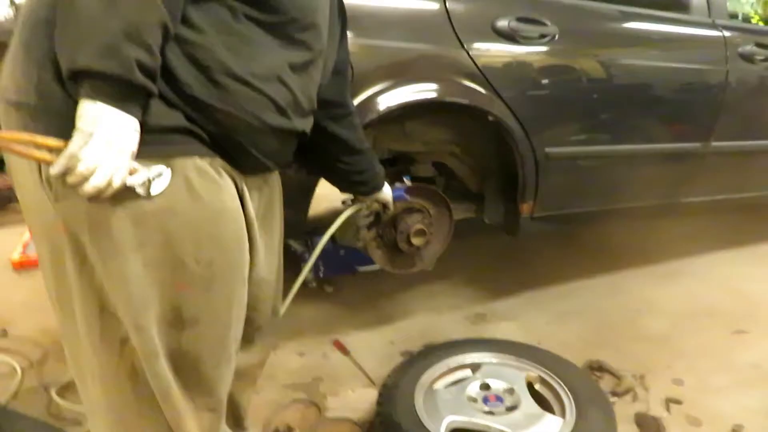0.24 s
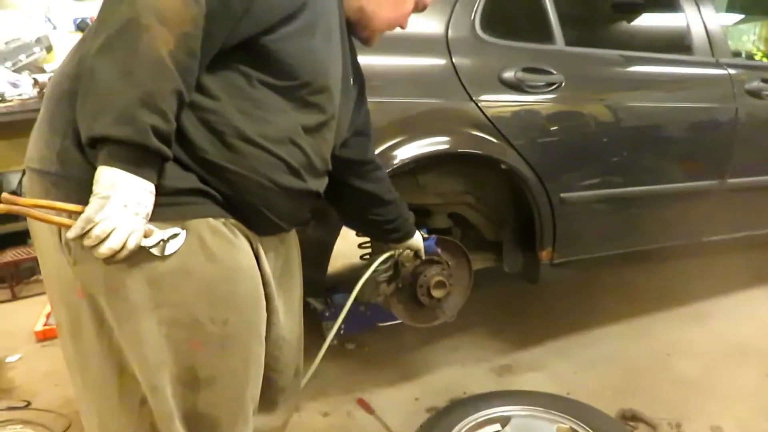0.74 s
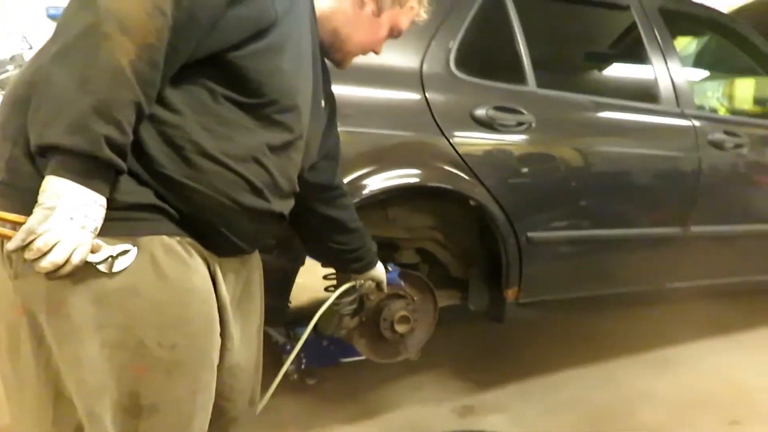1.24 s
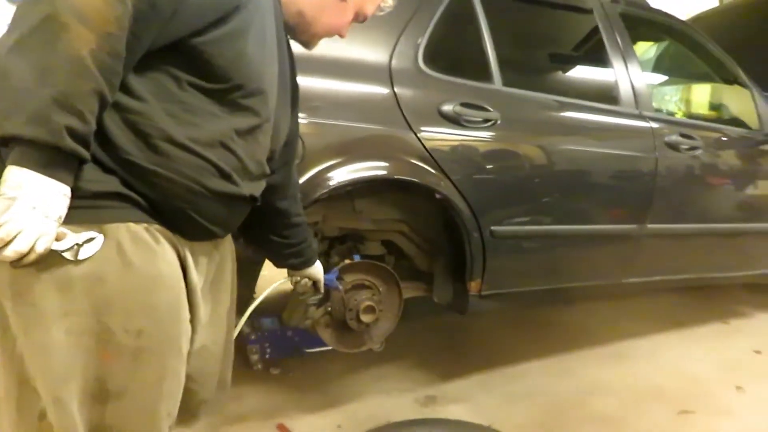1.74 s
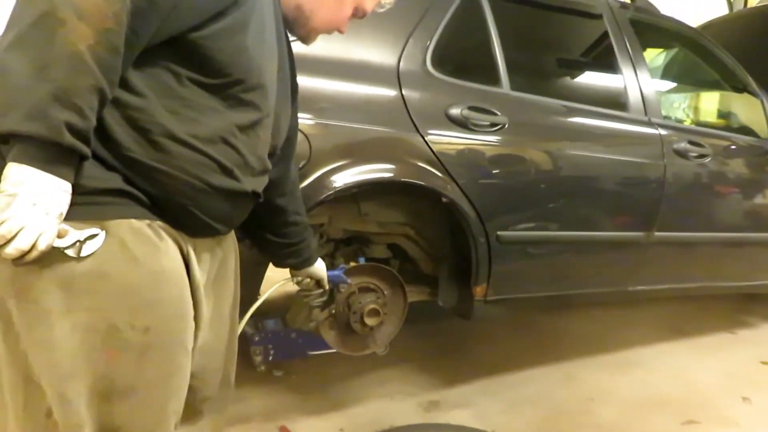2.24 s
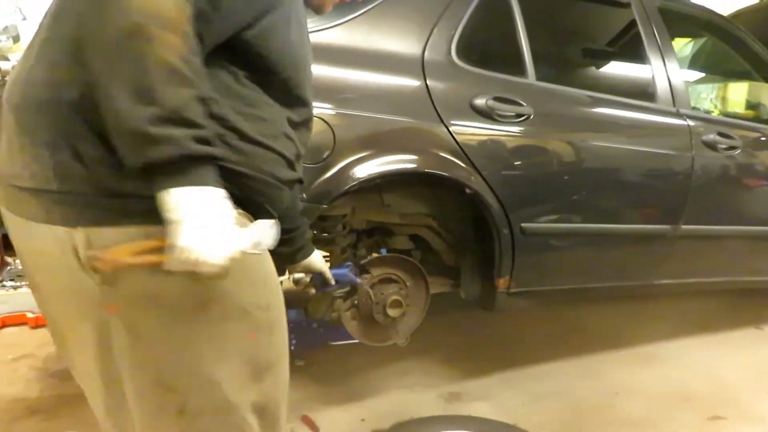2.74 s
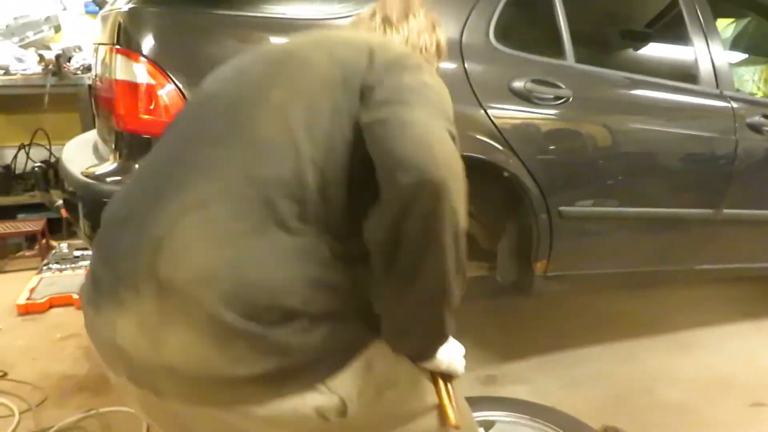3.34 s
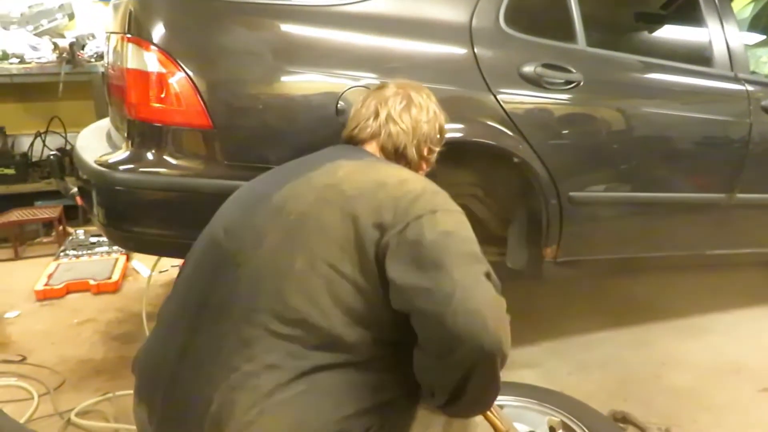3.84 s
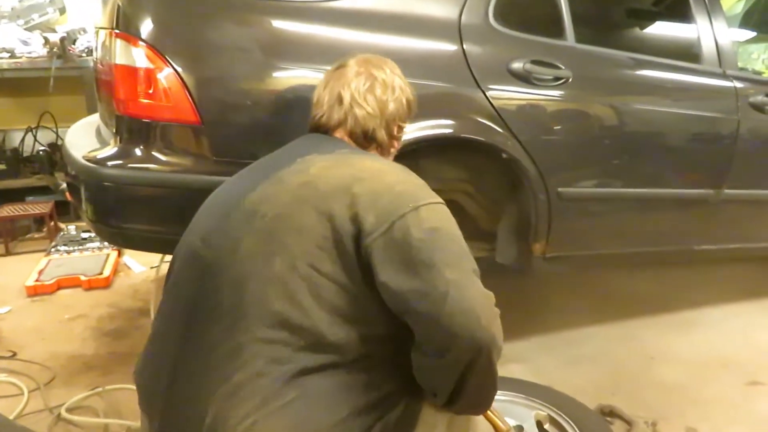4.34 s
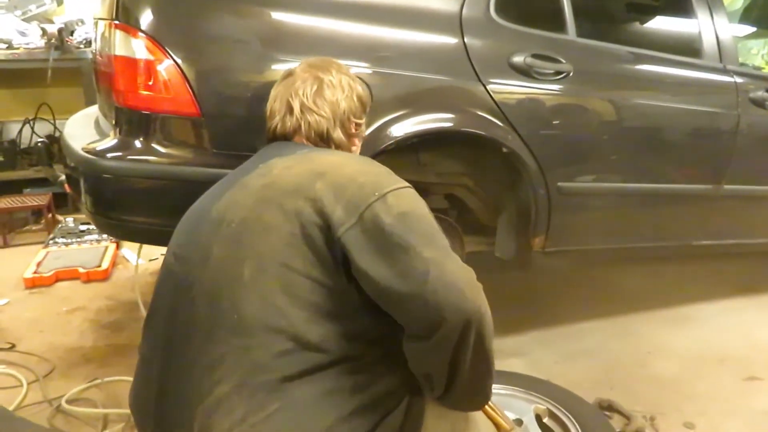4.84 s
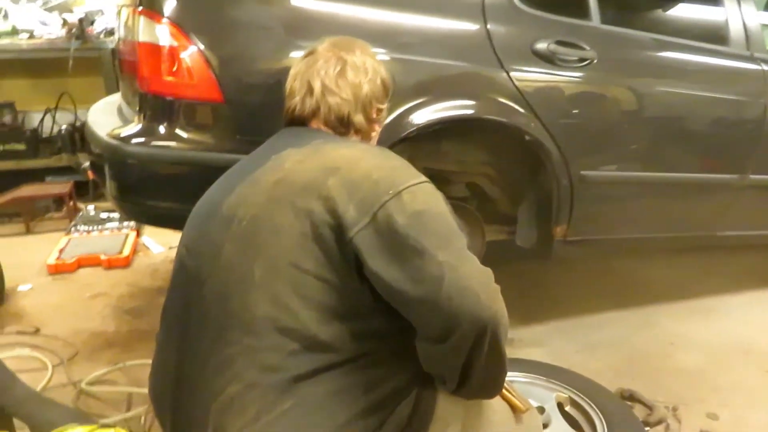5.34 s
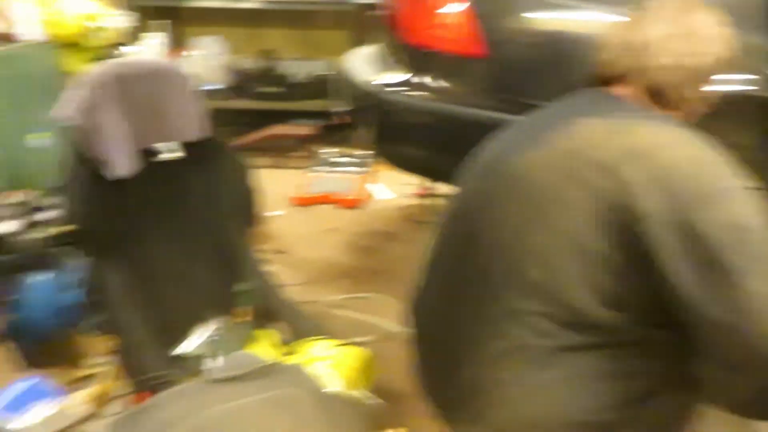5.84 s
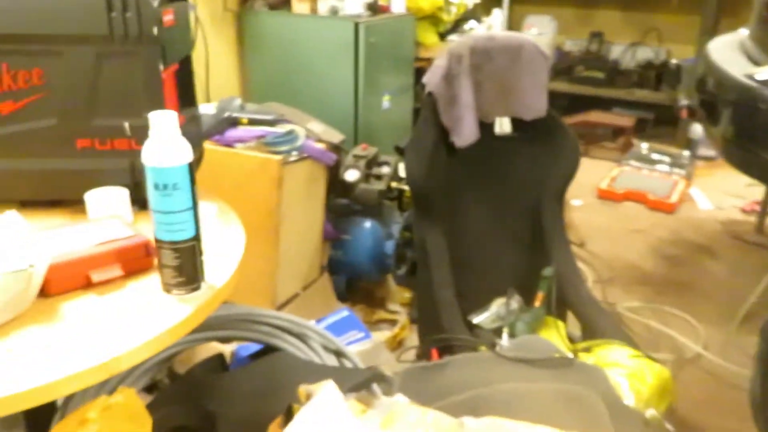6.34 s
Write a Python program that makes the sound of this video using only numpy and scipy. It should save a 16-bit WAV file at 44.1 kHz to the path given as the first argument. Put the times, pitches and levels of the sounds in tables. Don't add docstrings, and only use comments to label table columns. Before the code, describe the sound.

A handheld microphone in a small, short-echo garage picks up a wire brush scrubbing a rusty brake part. From 0 to 0.85 s the strokes are bright, gritty and fizzy, strongest near 0.7 s. Lighter, shorter strokes follow to 1.2 s, then two firm rasps to 1.5 s, and slower scrapes from 1.75 s that fade by 2.45 s. The metal rings faintly under the bristles. A piston compressor drones throughout, a buzzing low-mid hum with about forty-five pulses a second, exposed in the gap until 3.1 s. Scrubbing then returns lower and steadier, dips around 3.75-4.05 s, and grows strong and even from 4.6 to 5.15 s. Thin, fizzy strokes trail off and lift away by 5.95 s. As the microphone turns, from 5.6 to 6.15 s, the compressor becomes harsher and brighter, with airy hiss and valve clatter continuing alone to the end, about 6.6 s.

```python
import sys
import numpy as np
from scipy import signal
from scipy.fft import rfft, irfft, next_fast_len
from scipy.io import wavfile
from scipy.ndimage import uniform_filter1d

SR = 44100
rng = np.random.default_rng(int(sys.argv[2]) if len(sys.argv) > 2 else 0)


def level_to_linear(level):
    exponent = np.asarray(level, float) / 20
    return 10 ** exponent


def to_wav(s):
    ch = np.atleast_2d(s).T
    pcm = np.round(np.clip(ch, -1, 1) * 32767)
    wavfile.write(sys.argv[1], SR, pcm.astype(np.int16))


N = 291060


def evened(x):
    return x / np.sqrt(np.mean(x ** 2) + 1e-20)


def read(points, hz):
    f, value = np.transpose(points)
    return np.interp(np.log(hz + 1e-3), np.log(f + 1e-3), value)


def filtered(x, points):
    size = next_fast_len(N)
    gain = level_to_linear(read(points, np.fft.rfftfreq(size, 1 / SR)))
    return irfft(rfft(x, size) * gain, size)[:N]


def ring(x, hz, width):
    r = np.exp(-np.pi * width / SR)
    return signal.lfilter([1 - r, 0, r - 1], [1, -2 * r * np.cos(2 * np.pi * hz / SR), r * r], x)


def drift(per_s):
    knots = rng.standard_normal(1000)
    return evened(np.interp(np.arange(N) / SR * per_s, np.arange(1000), knots))


def coloured(x, gain):
    size, overlap = 512, 384
    hz, t, z = signal.stft(x, SR, nperseg=size, noverlap=overlap)
    return signal.istft(z * gain(hz[:, None], t), SR, nperseg=size, noverlap=overlap)[1][:N]


def unit(gain):
    return gain / np.sqrt(np.mean(gain ** 2, axis=0) + 1e-20)


def garage(x, t60):
    taps = np.zeros(SR // 2)
    at = np.arange(40, len(taps) - 20, 20)
    taps[at + rng.integers(0, 20, len(at))] = rng.choice([-1., 1.], len(at))
    taps *= level_to_linear(-60 * np.arange(len(taps)) / SR / t60)
    return signal.oaconvolve(x, taps / np.linalg.norm(taps))[:N]


# order [multiple], start_db, wheel_db, crouch_db, turned_db
ORDERS_DB = [(2, -29, -37, -31, -22), (3, -14.5, -13.5, -14, -13.5), (4, -10, -7.5, -7, -7.5),
             (5, -17, -12, -13, -18), (5.99, -1, 0, 0, 0), (6.97, -6, -6, -5.5, 1), (8, -34, -28, -37, -36),
             (9, -4.5, -7.5, -13, -4), (10, -6.5, -6.5, -12, -14), (10.99, -2, -3, -7.5, 0),
             (12, -10, -17, -9.5, 0.5), (12.986, 1.5, -1.5, -1, 0.5), (14.01, -0.5, -4, -8.5, -8),
             (15, -13, -6.5, -9, -12), (16, -16, -36, -31, 1), (17, -11.5, -12.5, -12, 0.5),
             (18, -7, -1.5, -3, -3), (19, -6, -2.5, -4, 0), (20, -19, -25, -38, -21),
             (21, -3, -2.5, -3, 7.5), (22, -29, -32, -36, 0), (23, -3, -3.5, -4, -1.5),
             (24, 0, -4.5, -5, -12), (25, 6, -14.5, -6, 9.5), (26, -3, -3.5, -3.5, 2),
             (27, -13, -4, -6, 11.5), (28, -5.5, -18, -9.5, -4), (29.1, -6, -5, -9.5, -4),
             (30, -8, -10, -13.5, -8), (31, -16, -5, -30, -10), (32.04, -6, -11, -28, -17),
             (33, -8, -13, -28, -1), (34.04, -24, -7, -11.5, 5), (35, -19, -10, -15, -5),
             (36, -13, -23, -32, -14), (36.97, -6.5, -4, -25, -2), (38, -26, -19, -32, -10),
             (38.93, -7, -9.5, -10.5, -4), (40, -26, -19, -24, -9), (41.04, -17, -7, -4, 1),
             (42, -15, -9, -11, -19), (43, -22, -8, -14, -22), (43.8, -4, -17, -11, -5),
             (44.8, -26, -8, -15, -13), (45.7, -9, -6, -11, -20), (47, -26, -7, -19, -18),
             (48, -20, -9.5, -13, -10), (49.2, -14, -14, -27, -5), (49.8, -26, -19, -31, -8),
             (51, -28, -12, -19, -3), (52, -11, -20, -32, -5), (53, -18, -18, -15, 0),
             (54, -23, -16, -16, -4), (54.7, -24, -16, -14, -15), (56.8, -12, -21, -35, -17),
             (57.2, -16, -15, -20, -16), (58, -16, -15, -31, -17), (59.4, -16, -31, -21, -21),
             (60.7, -19, -23, -20, -9)]
PLACE_S = [.4, 2.2, 2.9, 3.9, 5.5, 6.2]
PLACE_OF = [1, 2, 2, 3, 3, 4]


def shaft(turns, t, smear):
    table = np.array(ORDERS_DB, float)
    coarse = t[::4]
    knots = t[::256]
    wobble_db = 0.85 * rng.standard_normal((len(table), 50))
    lag = smear * np.cumsum(rng.standard_normal(len(table)))
    tones = np.zeros(len(coarse))
    for row, wobble, late in zip(table, wobble_db, lag):
        db = np.interp(knots, PLACE_S, row[PLACE_OF])
        db += np.interp(knots * 6, np.arange(50), wobble)
        tones += np.interp(coarse, knots, level_to_linear(db)) * np.cos(2 * np.pi * (row[0] * turns[::4] + late))
    return signal.resample_poly(tones, up=4, down=1)[:N]


# start_s, sixth_order_hz, sixth_order_db, first_order_db, mains_hum_db
PUMP = [(0.0, 270.9, -35.5, -61, -44), (0.15, 269.8, -35, -57, -43), (0.24, 269.9, -35, -58, -41),
        (0.33, 269.8, -33, -50, -39.5), (0.44, 269.8, -38, -53, -42), (0.57, 269.8, -35, -51, -43),
        (0.75, 270.1, -42.5, -59, -49), (1.23, 270.5, -38, -56, -44), (1.27, 270.4, -39.5, -56, -45.5),
        (2.11, 270.4, -34.5, -51, -41.5), (2.2, 270.4, -36, -54, -41), (2.7, 270.4, -31.5, -46, -39),
        (3.14, 270.4, -27.5, -44, -34), (3.34, 270.4, -36.5, -54, -43.5), (4.06, 270.4, -30, -47, -38.5),
        (4.17, 270.4, -34, -52, -41), (4.47, 270.4, -31, -48, -39.5), (4.7, 270.4, -31.5, -49, -38),
        (4.85, 270.4, -31, -44, -35), (4.94, 270.4, -37.5, -49, -46), (5.26, 270.4, -35, -50, -45),
        (5.33, 270.4, -34, -43.5, -39), (5.73, 270.4, -33, -38, -38), (5.79, 271.0, -34.5, -44, -41),
        (5.86, 270.7, -35, -61, -43.5), (6.07, 270.7, -36, -58, -43.5), (6.54, 270.6, -33, -52, -40),
        (6.6, 269.8, -32, -51, -44)]
# freq_hz, level_db [per 10 Hz]
HISS_AWAY = [(30, -45), (110, -35), (180, -22.5), (400, -23), (800, -24.5), (2200, -25.5), (3600, -23),
             (4700, -30.5), (8100, -36.5), (10100, -42.5), (14400, -50)]
# freq_hz, level_db [per 10 Hz]
HISS_FACING = [(30, -46), (110, -36), (180, -21.5), (400, -20.5), (800, -17), (2200, -16.5), (3600, -15),
               (4700, -22.5), (8100, -28.5), (10100, -33), (14400, -39)]
# freq_hz, width_hz, level_db
VALVES = [(9000, 200, -22), (7740, 180, -30), (5950, 150, -23), (4500, 130, -20)]
TURN_S = [5.58, 6.15]


def compressor():
    t = np.arange(N) / SR
    s, *columns = np.transpose(PUMP)
    hz, level_db, first_db, mains_db = (np.interp(t, s, c) for c in columns)
    turns = np.cumsum(uniform_filter1d(hz, SR // 2)) / (SR * 6)
    hum = level_to_linear(mains_db) * np.cos(2 * np.pi * 202 * t)
    low = level_to_linear(first_db) * np.cos(2 * np.pi * turns) + hum
    puff = np.exp(1.1 * (np.cos(2 * np.pi * (turns + 0.081)) - 1))
    air = rng.standard_normal(N)
    puffed = np.sqrt(SR / 20) * evened((1.6 + puff) * air)
    facing = np.interp(t, TURN_S, [0, 1])
    hiss = (1 - facing) * filtered(puffed, HISS_AWAY) + facing * filtered(puffed, HISS_FACING)
    reeds = sum(level_to_linear(db) * evened(ring((0.37 + puff) * air, f, w)) for f, w, db in VALVES)
    pump = np.sqrt(2) * shaft(turns, t, smear=.18) + hiss + level_to_linear(7.8 * facing) * reeds
    return np.sqrt(2) * low + level_to_linear(level_db) * pump


def bristles(per_s, spread_db, smooth):
    size = level_to_linear(spread_db * np.minimum(rng.exponential(1, N), 5)) * rng.choice([-1., 1.], N)
    slips = evened(size * (rng.random(N) < per_s / SR))
    return evened(slips + smooth * rng.standard_normal(N))


# start_s, scrape_db, centre_hz, fizz_db, edge_db, rumble_db [over scrape]
STROKES = [
    [(0.0, -37, 2260, -27.5, -32, -6), (0.234, -25, 3530, -24, -28.5, -6),
     (0.332, -29, 2730, -27, -28.5, -9), (0.384, -23, 3520, -21.5, -24, -6),
     (0.534, -26.5, 2660, -25.5, -28, -7), (0.564, -21.5, 3370, -29, -31, -8),
     (0.688, -14, 3500, -31, -37, -17), (0.788, -23.5, 3100, -36, -32, -14),
     (0.85, -30, 2710, -32, -36, -13)],
    [(0.86, -27, 2800, -31, -33, -9), (0.916, -32, 3030, -34, -37, -9),
     (0.956, -22.5, 3370, -33, -30.5, -9), (1.018, -33.5, 2380, -35, -35, 2),
     (1.17, -23.5, 3350, -30.5, -31, -10)],
    [(1.18, -25, 3130, -35, -29, -11.5), (1.22, -19, 3200, -31, -32.5, -10.5),
     (1.348, -25, 2950, -33, -31, -9.5), (1.398, -15.5, 3100, -33, -32, -11),
     (1.5, -38.5, 2300, -39, -37, -4)],
    [(1.51, -35, 2370, -41, -39, -9), (1.656, -40, 1930, -46, -45, -9), (1.726, -41, 2530, -38, -40, -7),
     (1.75, -18, 2670, -30, -26.5, -8), (1.854, -25.5, 2300, -31.5, -31.5, -3),
     (2.012, -22.5, 2800, -28, -25.5, -9), (2.212, -19, 2500, -28.5, -28.5, -6.5),
     (2.324, -32, 2730, -30, -29.5, -10), (2.378, -32, 2070, -33, -31.5, -11),
     (2.47, -43, 1930, -60, -48, -9)],
    [(3.1, -35, 2050, -41, -40, -9), (3.18, -20, 2210, -27, -24, -6), (3.298, -17.5, 2400, -33, -27, -10.5),
     (3.408, -19.5, 2780, -34, -27.5, -12.5), (3.566, -18, 2690, -34.5, -29, -9.5),
     (3.648, -28, 2720, -39, -33, -10), (3.736, -36, 2040, -39, -40, -9), (3.958, -41, 1990, -38, -36, -9),
     (4.0, -29, 1930, -35, -35, -9)],
    [(4.01, -38, 2230, -38, -39, -9), (4.096, -18.5, 2780, -30, -23, -10),
     (4.166, -21, 3050, -25, -26.5, -12.5), (4.256, -28, 2440, -36, -36, -9),
     (4.318, -23.5, 2330, -31, -27.5, -11), (4.48, -33, 2750, -35, -34, -9)],
    [(4.49, -27, 2480, -36, -32, -9), (4.602, -18.5, 2860, -32, -29, -15),
     (4.794, -21, 2700, -32.5, -31.5, -13), (4.916, -16.5, 3190, -33, -24.5, -17),
     (5.0, -21, 2480, -34, -29, -15.5), (5.102, -19.5, 3160, -31, -24.5, -15),
     (5.16, -31, 2460, -39, -35, -12), (5.2, -28, 2620, -43, -36, -9)],
    [(5.21, -27.5, 2460, -42, -35, -11), (5.278, -31, 2750, -37, -32.5, -9),
     (5.36, -26.5, 3400, -26, -24.5, -8), (5.562, -29, 3030, -29, -25.5, -9),
     (5.618, -34, 2180, -35.5, -32.5, -9), (5.774, -34, 2130, -31, -29.5, -15),
     (5.94, -35, 1970, -49, -47, -7), (5.95, -26, 2060, -47, -36, -9)],
]
# freq_hz, width_hz, level_db
PART = [(1900, 140, -1), (2226, 44, -4.5), (2900, 48, -0.5), (3140, 51, 0.5), (3775, 29, -2),
        (4230, 34, -1.5), (4700, 90, -9), (5000, 75, -19), (6130, 65, -5), (7570, 42, -20), (8140, 68, -15)]
# ratio [multiple of centre], level_db
SCRAPE = [(.2, -37), (.45, -17), (.75, -4), (1, -1.5), (1.35, -3.5), (1.9, -9.5), (3, -32)]
# freq_hz, level_db
RUMBLE = [(150, -28), (400, -7), (800, -3.5), (1400, -1.5), (1900, -4), (2600, -28)]
# freq_hz, level_db
EDGE = [(2500, -18), (4500, -1), (5500, -1), (7000, 0), (9000, -5), (11000, -21.5), (14000, -34)]
# freq_hz, level_db
FIZZ = [(6000, -40), (8500, -11.5), (10000, -0.5), (13000, 2), (14500, -3), (15700, -8)]
# fade_out_start_s, fade_out_end_s, fade_in_start_s, fade_in_end_s
LIFTED_S = [(2.4, 2.48, 3.08, 3.13), (5.862, 5.958, 7, 8)]


def brush():
    s, scrape_db, centre, fizz_db, edge_db, rumble_db = np.concatenate(STROKES).T
    t = np.arange(N) / SR
    judder = level_to_linear(0.96 * drift(45) + 1.0 * drift(160))
    slips = judder * bristles(6000, spread_db=2.76, smooth=1.2)
    rung = sum(level_to_linear(db + 4.1 * drift(9)) * evened(ring(slips, f, w)) for f, w, db in PART)
    body = evened(slips + level_to_linear(-15) * evened(rung))

    def hump(f, when):
        return unit(level_to_linear(read(SCRAPE, f / np.interp(when, s, centre))))

    scrape = coloured(body, hump)
    scrape /= np.sqrt(uniform_filter1d(scrape ** 2, SR // 8))
    tips = judder * bristles(9000, spread_db=2.9, smooth=1.55)
    layers = ((scrape, scrape_db),
              (filtered(slips, RUMBLE), scrape_db + rumble_db),
              (filtered(tips + 0.23 * body, EDGE), edge_db),
              (filtered(tips, FIZZ), fizz_db))
    touch = np.prod([np.interp(t, lifted, [1, 0, 0, 1]) for lifted in LIFTED_S], axis=0)
    return touch * sum(evened(x) * level_to_linear(np.interp(t, s, db)) for x, db in layers)


# freq_hz, side_over_mid_db
WIDE = [(60, -40), (110, -40), (200, -61), (380, -30), (700, -16.5), (1290, -19), (2380, -20), (4400, -11),
        (8120, -5.5), (15000, -0.5)]


def port_difference(mid):
    def random_phase(f, when):
        return np.exp(2j * np.pi * rng.random((len(f), len(when))))

    side = coloured(mid, random_phase)
    return filtered(side * np.std(mid) / np.std(side), WIDE)


def scene():
    strokes = brush()
    mid = compressor() + strokes + level_to_linear(-10.5) * garage(strokes, t60=0.25)
    side = port_difference(mid)
    return np.array([mid + side, mid - side])


def top_cut(x):
    return signal.sosfilt(signal.butter(12, 16530, fs=SR, output="sos"), x)


def record(dry):
    limited = np.tanh(dry * .7) / .7
    limited = signal.oaconvolve(limited, signal.firwin(255, 15750, fs=SR)[None], "same")
    return top_cut(limited)


dry = scene()
out = record(dry)
to_wav(out)
```